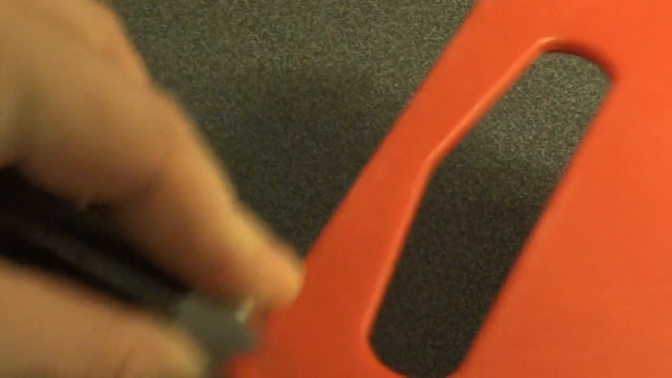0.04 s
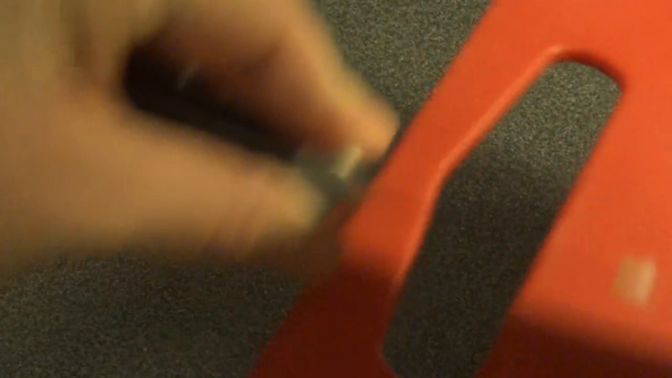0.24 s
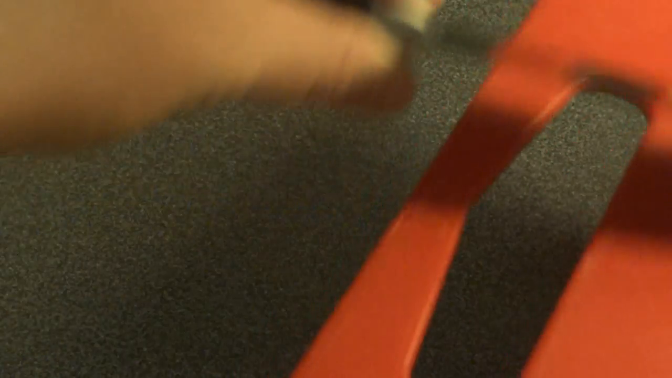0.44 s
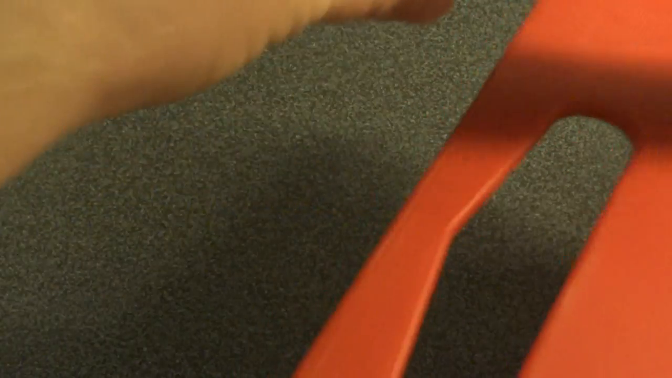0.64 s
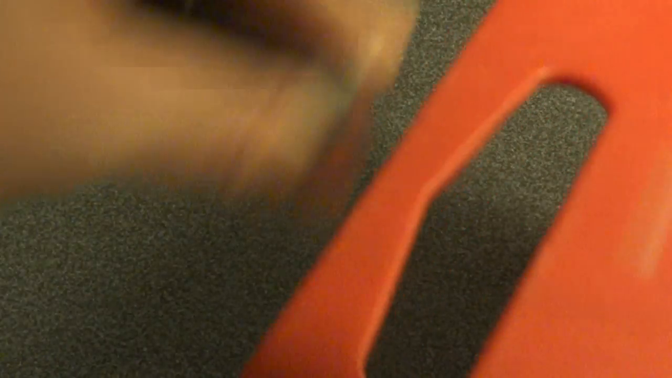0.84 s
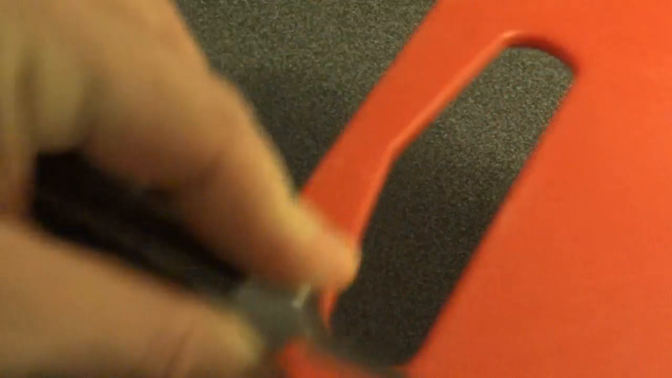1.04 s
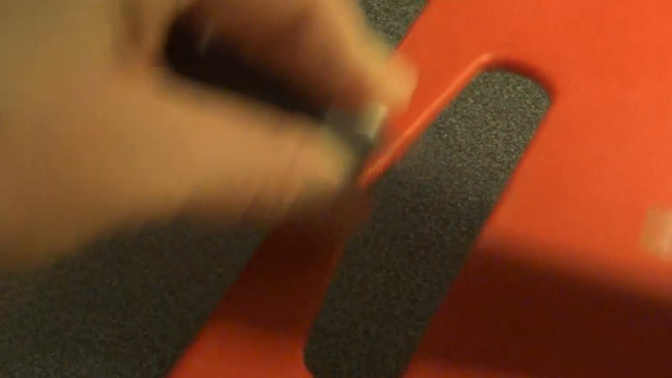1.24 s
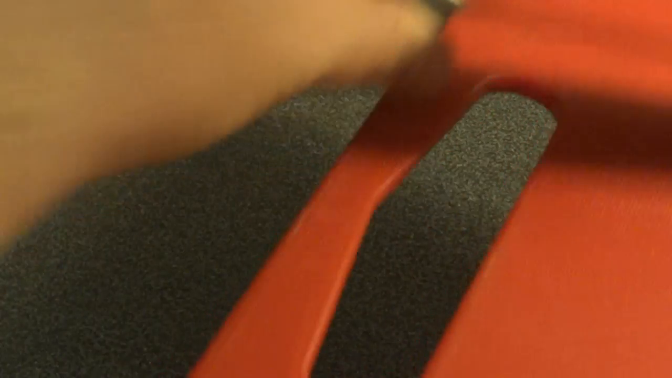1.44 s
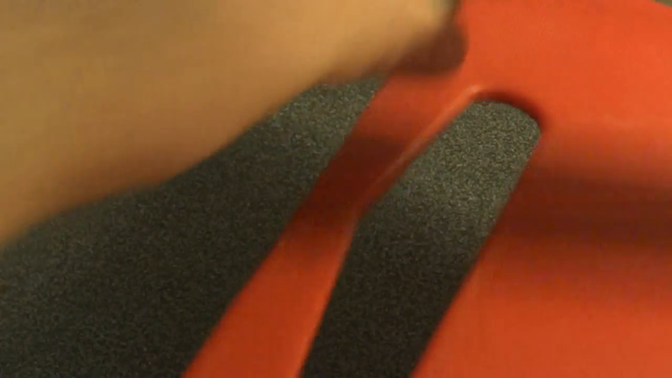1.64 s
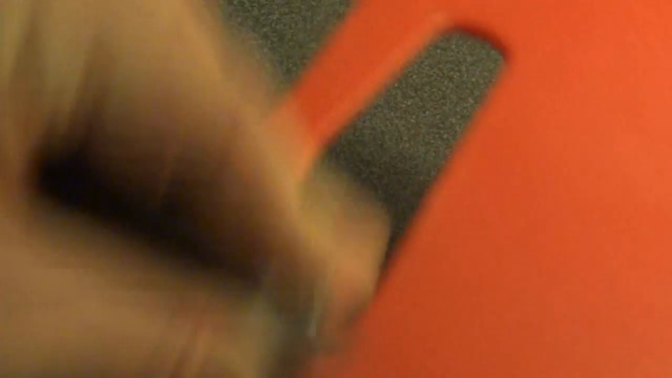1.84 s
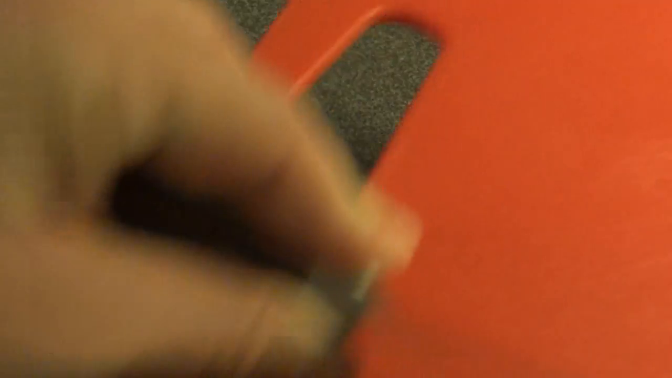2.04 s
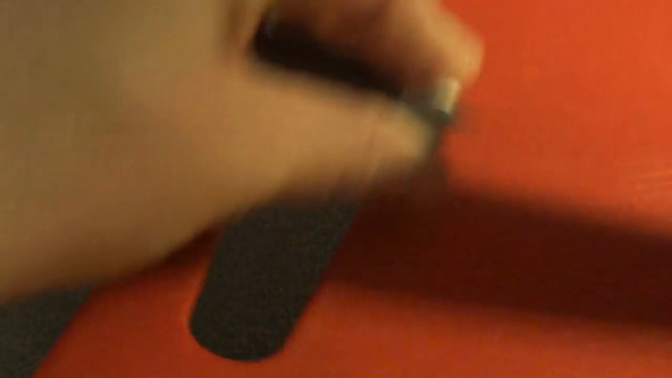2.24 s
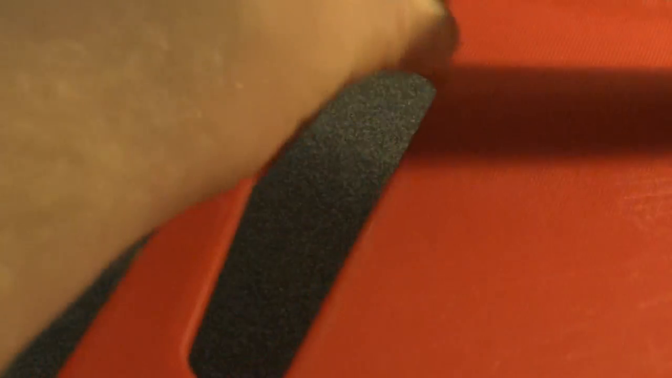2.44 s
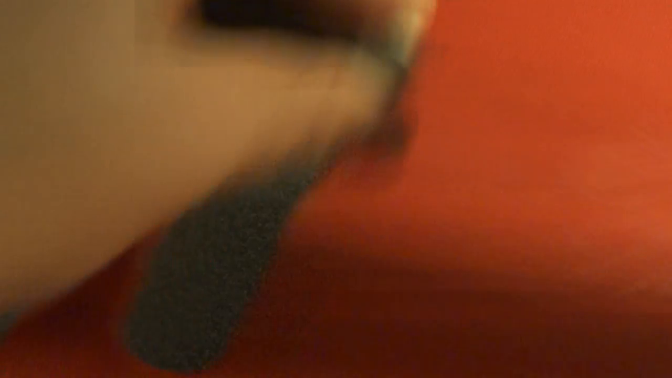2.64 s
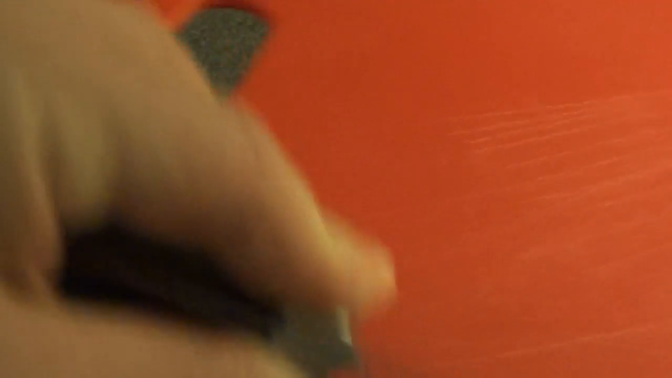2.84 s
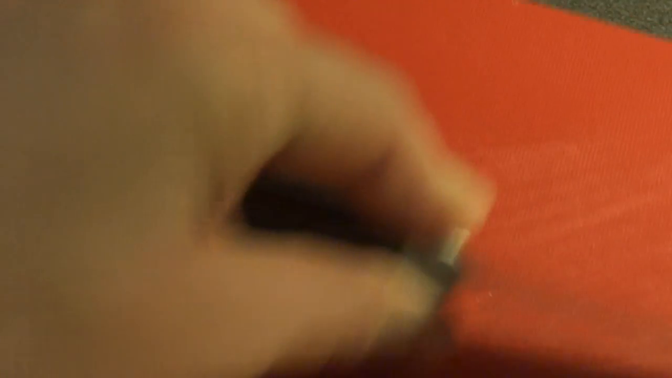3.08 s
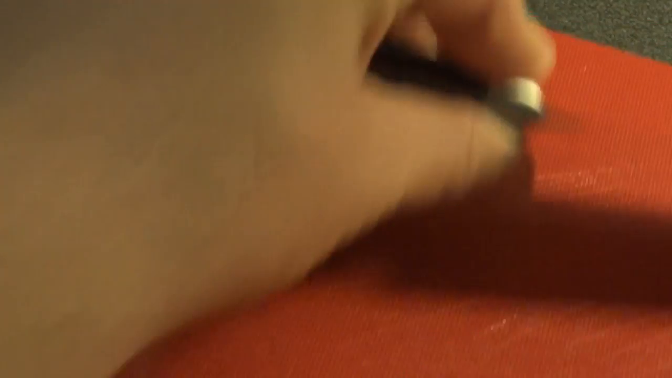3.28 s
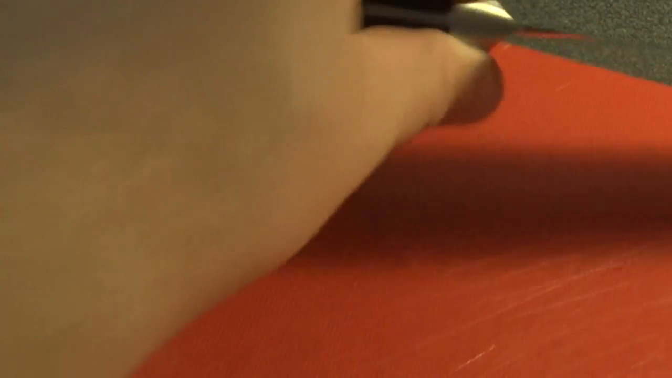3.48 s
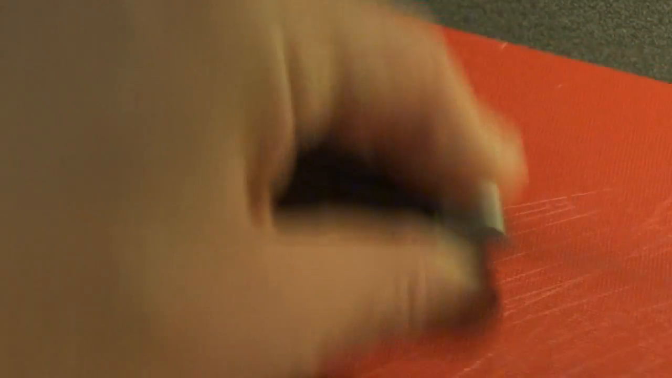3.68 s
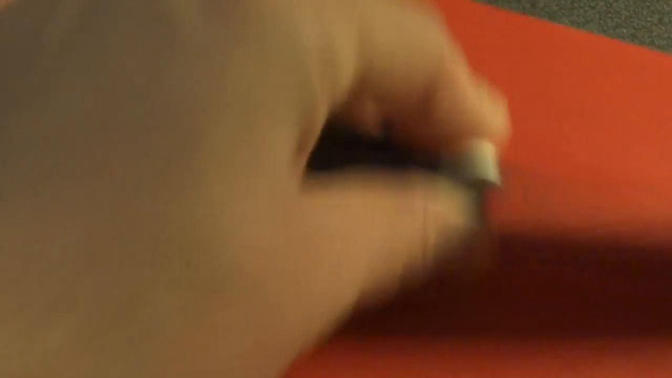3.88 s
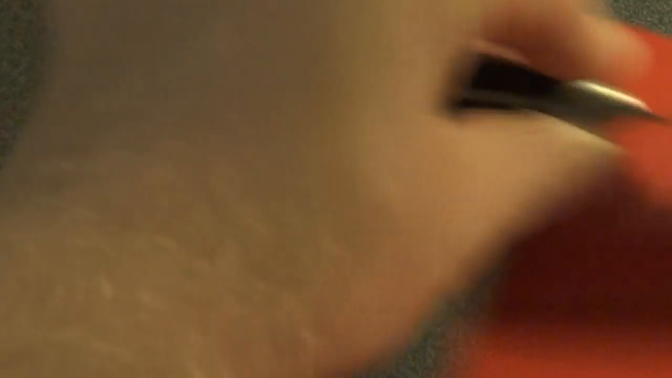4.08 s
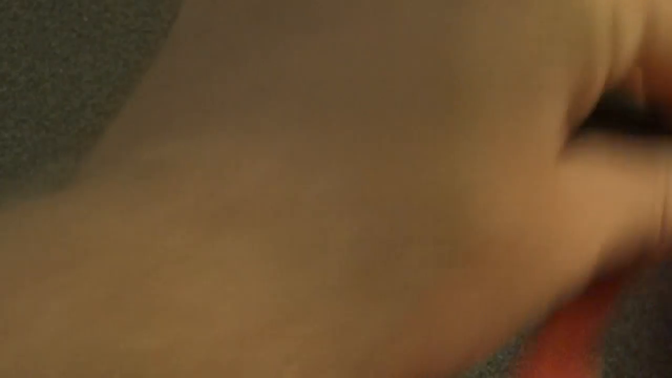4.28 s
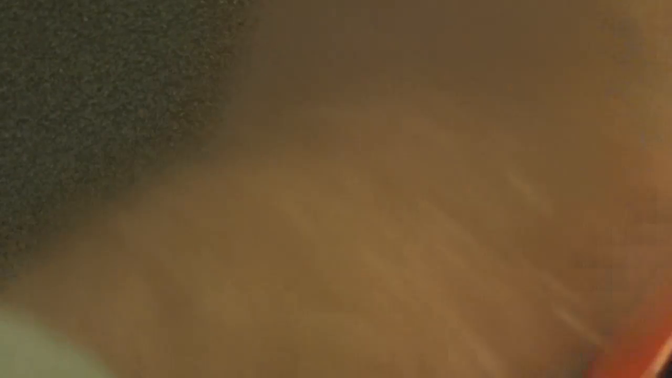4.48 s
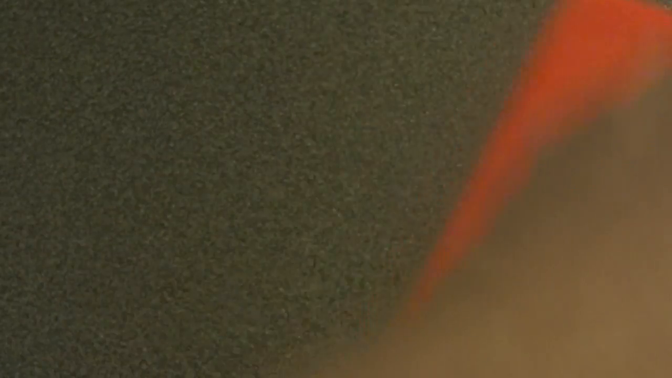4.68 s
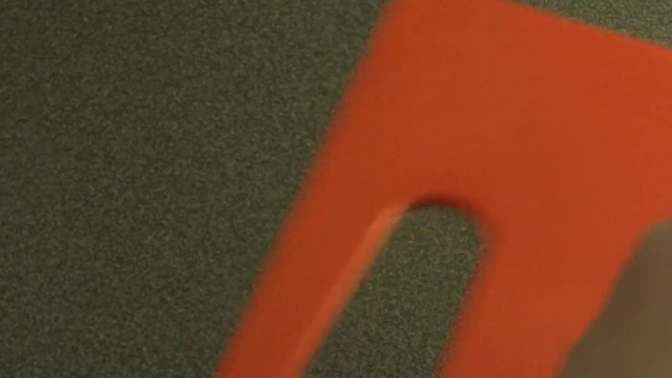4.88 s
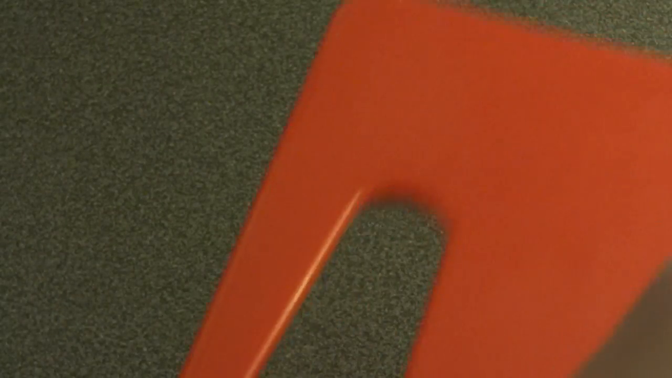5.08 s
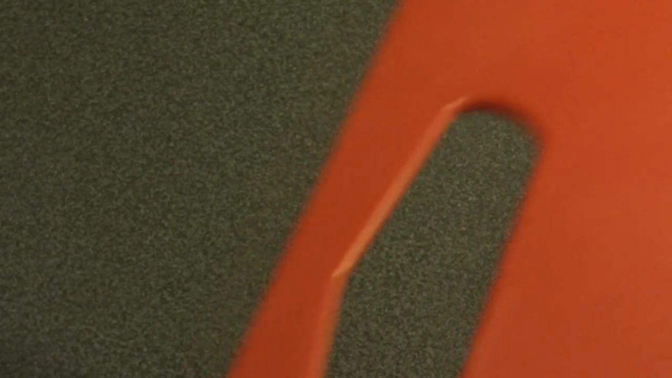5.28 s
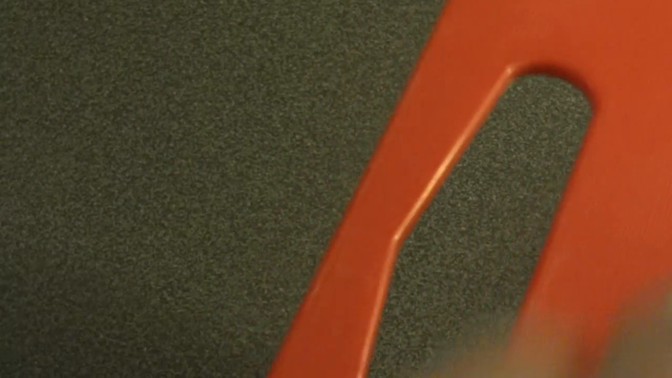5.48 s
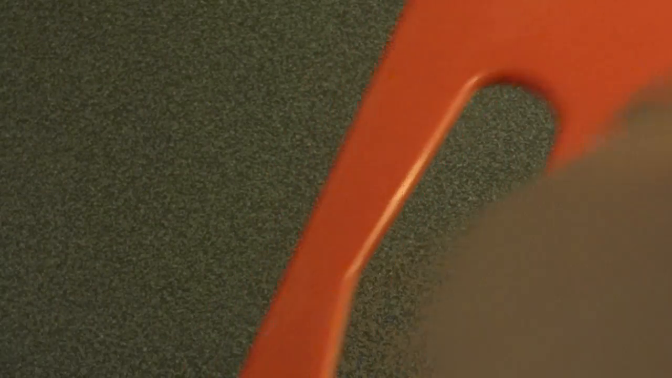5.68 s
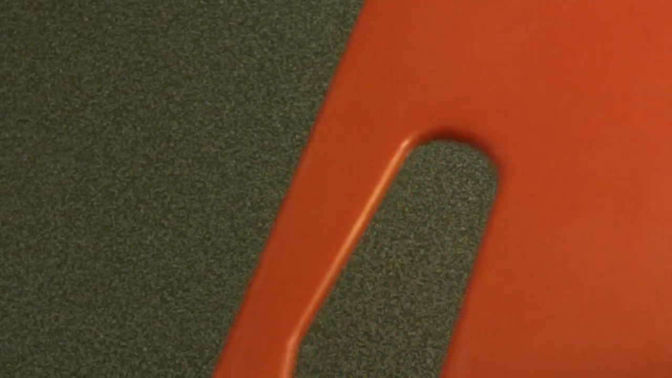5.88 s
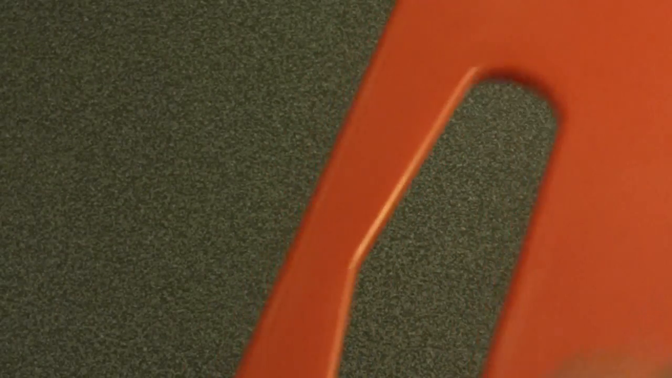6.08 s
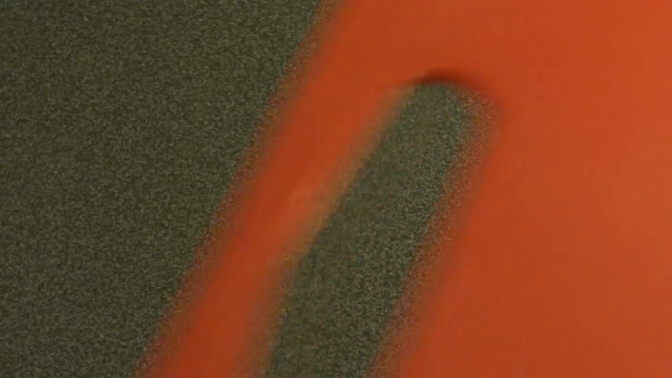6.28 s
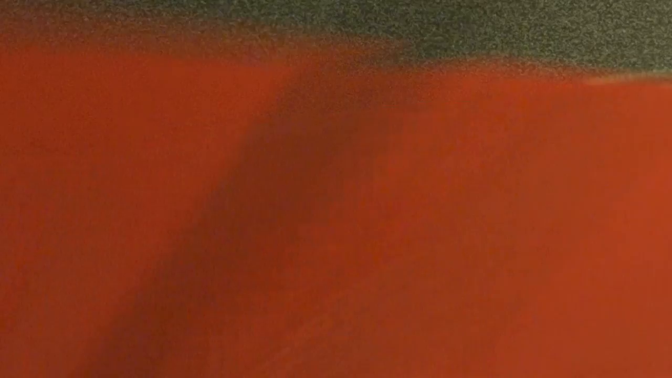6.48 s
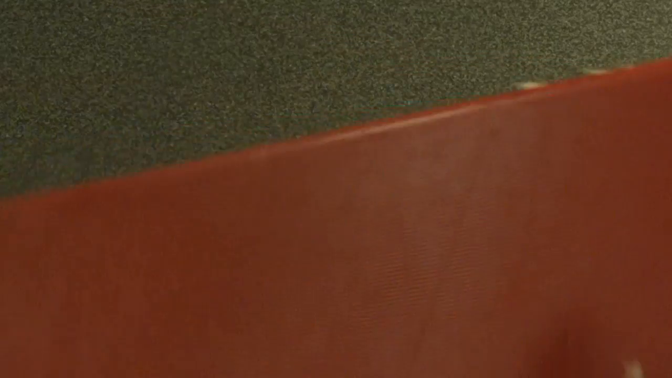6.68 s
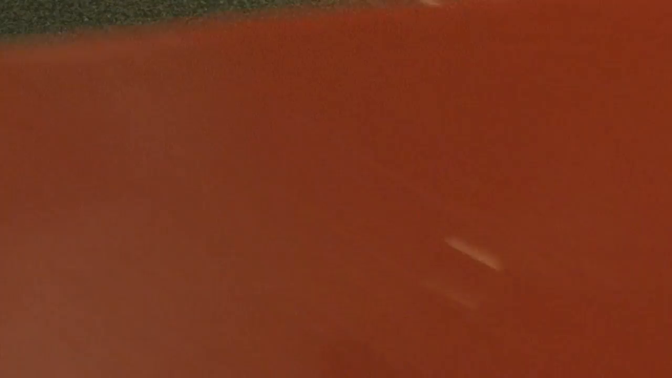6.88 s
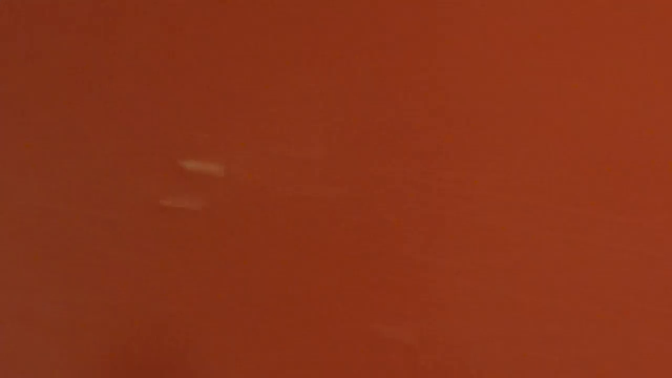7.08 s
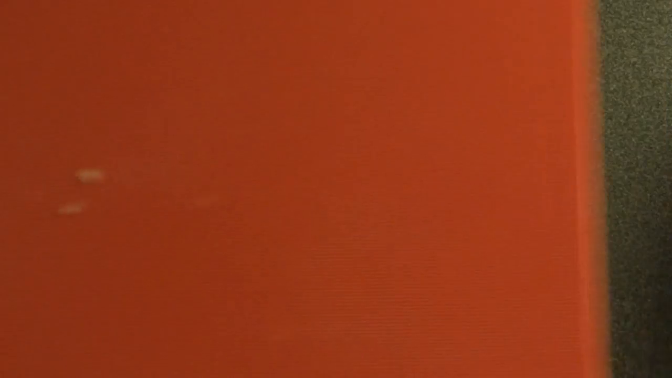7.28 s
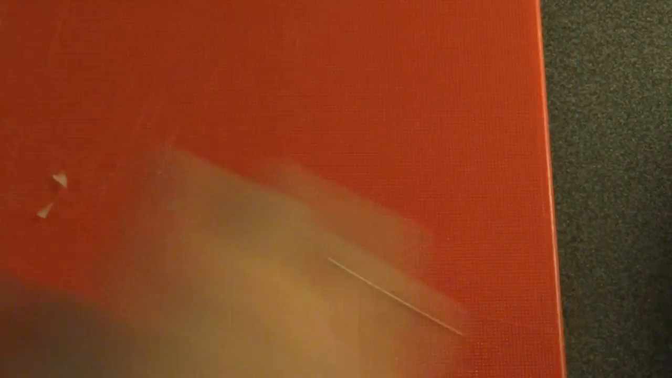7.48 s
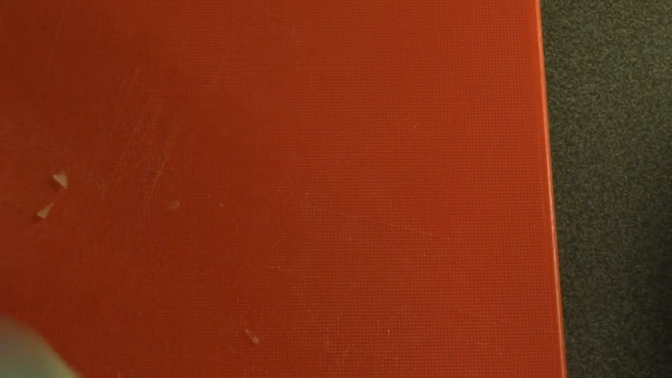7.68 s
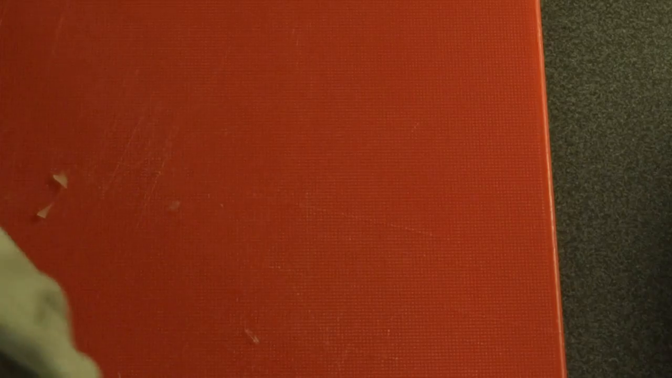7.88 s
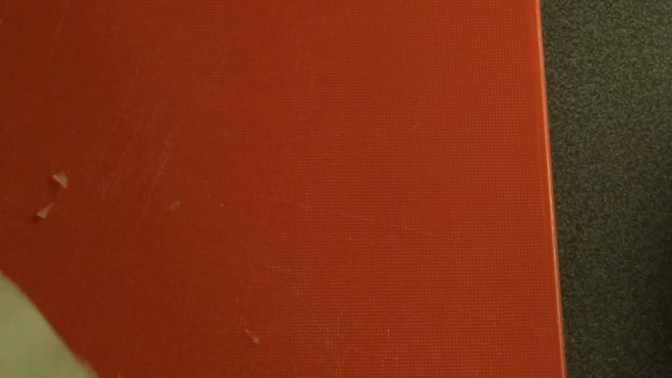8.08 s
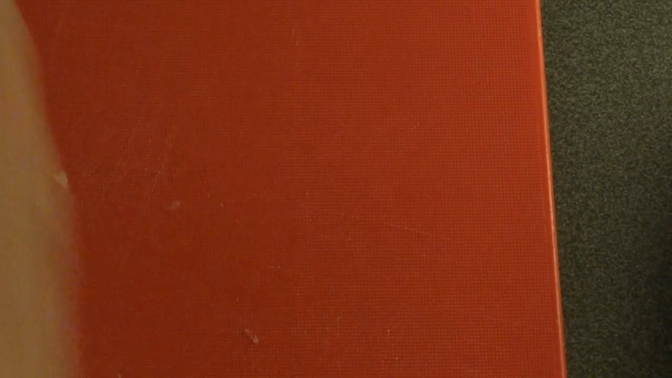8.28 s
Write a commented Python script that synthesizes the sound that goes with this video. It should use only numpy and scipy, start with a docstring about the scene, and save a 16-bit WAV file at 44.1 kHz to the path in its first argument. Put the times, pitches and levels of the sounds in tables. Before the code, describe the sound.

Over soft hiss and a faint electronic whine, a blade taps and scrapes a ridged plastic cutting board again and again, each stroke swelling and cutting off. A quieter stretch has light rubs, ringing edge flicks and a burst of sharp ticks. The board is knocked, slid and put down on the counter. Close stereo microphones, short lively room echo.

```python
"""Over a hiss and a thin electronic whine, a kitchen knife lands on a textured plastic cutting board
and rasps across it, stroke after stroke, close to the microphone. Later the blade is wiped and zings,
and the board is dragged over the counter and set down. A small hard kitchen answers.
Blows and blade are decaying tones and noise bursts, scraping is uneven jolts through the board's
resonances plus shaped noise, the kitchen is fading noise used as an echo; background noise slowly swells."""
import sys
import numpy as np
from scipy import signal
from scipy.fft import rfft, irfft, next_fast_len
from scipy.io import wavfile
from scipy.ndimage import uniform_filter1d, map_coordinates

SR = 44100
rng = np.random.default_rng(int(sys.argv[2]) if len(sys.argv) > 2 else 0)


def file_out(sig):
    """Save sig as 16-bit WAV at sys.argv[1]."""
    # one column per channel
    cols = np.atleast_2d(sig).T
    # limit, then scale
    lim = np.clip(cols, -1, 1)
    pcm = np.round(lim * 32767).astype(np.int16)
    wavfile.write(sys.argv[1], SR, pcm)


def nominal_scale(level):
    """Amplitude ratio for a level in decibels (scalar or array-like)."""
    x = np.asarray(level, float) / 20
    return 10 ** x


N = 367794
TIME = np.arange(N) / SR  # seconds


def unit(x):
    """Scales a sound to rms 1."""
    return x / np.sqrt(np.mean(x ** 2) + 1e-20)


def along(points, hz):
    """Reads a curve of (frequency, value) points on a log frequency axis."""
    f, v = np.transpose(points)
    return np.interp(np.log(hz + 1), np.log(f + 1), v)


def wobble(rate):
    """A smooth random curve with rate knots a second."""
    knots = rng.standard_normal(int(N * rate / SR) + 4)
    return map_coordinates(knots, [TIME * rate])


def filtered(x, response):
    """Multiplies the spectrum of x by a complex response of frequency."""
    m = next_fast_len(N + SR // 2)
    hz = np.fft.rfftfreq(m, 1 / SR)
    return irfft(rfft(x, m) * response(hz), m)[..., :N]


def coloured(x, spectrum):
    """Shapes x with a spectrum and brings it to rms 1."""
    return unit(filtered(x, lambda hz: nominal_scale(along(spectrum, hz))))


def add(track, s, sound):
    """Mixes a sound into the track at s seconds."""
    part = track[round(s * SR):][:len(sound)]
    part += sound[:len(part)]


# colour of the background hiss: (frequency [Hz], level [dB])
FLOOR_COLOUR = [(35, -61.5), (60, -24.5), (295, -2), (582, -4.5), (719, -2), (2160, -8), (11900, -16.5),
                (16200, -17.5)]
# steady tones of the whine: (frequency [Hz], middle level [dB rms])
WHINE_TONES = [(4107, -76.5), (8161, -85.5), (8215, -74.5), (8258, -79.5), (10573, -107), (12365, -71.5)]


def floor():
    """Room air and microphone hiss are shaped noise; the whine is sine tones, slightly unsteady."""
    mid, side = coloured(rng.standard_normal((2, N)), FLOOR_COLOUR)
    whine = np.zeros(N)
    for hz, db in WHINE_TONES:
        level = np.sqrt(2) * nominal_scale(db + 3.2 * wobble(34))
        whine += level * np.sin(2 * np.pi * hz * TIME + .7 * wobble(25))
    hiss = mid + np.outer([.3, -.3], side)
    return nominal_scale(-59.5) * hiss + whine


# resonances of the cutting board: (frequency [Hz], width [Hz], level [dB])
BOARD_MODES = [(315, 33, -5.5), (418.8, 19.3, 2.5), (470, 14, -2.5), (521.3, 17, 0), (608, 68, -2.5),
               (726.2, 19, 3), (768, 18, -7), (823.3, 25, -2.5), (931.4, 27, -4), (1017.7, 19, -4),
               (1158, 100, -12), (1256, 17, -7), (1375, 55, -13), (1629, 58, -19), (1925, 56, -16)]


def board(x):
    """Sends x through the board's resonances; a small plate radiates little bass."""
    def response(f):
        total = 0
        for k, (centre, width, db) in enumerate(BOARD_MODES):
            resonance = 1j * f * width / (centre * centre - f * f + 1j * f * width)
            total = total + (-1) ** k * nominal_scale(db) * resonance
        return total * 1j * f / (250 + 1j * f)
    return filtered(x, response)


def ring(modes, damping, rise, tilt_db):
    """Half a second of metal ringing: decaying tones, at slightly new strengths each time."""
    hz, db, t60 = np.transpose(modes)[:, :, None]
    t = TIME[:SR // 2]
    scatter_db = 1.5 * rng.standard_normal(db.shape)
    level = db + scatter_db + tilt_db * np.log2(hz / 4000) - 60 * t / (t60 * damping)
    # a hand-held blade never rings quite pure
    drift = .7 * np.cumsum(rng.standard_normal(level.shape), axis=1) / np.sqrt(SR)
    phase = 2 * np.pi * (hz * t + drift + rng.random(db.shape))
    return (nominal_scale(level) * np.sin(phase)).sum(0) * (1 - np.exp(-(t / rise) ** 2))


def band(lo_hz, hi_hz, x):
    """Keeps the sound between two frequencies."""
    return signal.sosfilt(signal.butter(2, [lo_hz, hi_hz], "band", fs=SR, output="sos"), x)


# blows on the board; the last three levels are relative to the second column:
# (time [s], level [dB], thud [dB], treble [dB], blade ring [dB])
BLOWS = [(.011, -18.5, 3.5, -26, -25), (1.028, -18, 5.5, -27, -29.5), (1.926, -11.5, -1.5, -35.5, -33),
         (2.9066, -15.5, 3, -24.5, -27.5), (3.8008, -26.5, 13, -22, -25), (4.26, -17, 4.5, -21, -26),
         (4.9696, -17, -5, -1.5, -21.5), (5.8677, -27.5, 1, 13.5, 1), (6.7196, -10.5, -9, -13.5, -27.5),
         (6.792, -15, -11, -20.5, -27), (7.3765, -10, -7.5, -9.5, -26.5)]
# the blade bending as a whole: (frequency [Hz], level [dB], undamped time to fall 60 dB [s])
BLADE_MODES = [(1475, -5, 1.4), (3463, 0, .75), (5986, -5, .7), (9512, -9, .42), (12770, -11, .33)]


def taps():
    """Each blow: a click in the plastic, a thud in the board, a splash of treble and a ring of the blade."""
    click, thuds, splash, blade = np.zeros((4, N))
    t = TIME[:SR // 10]
    # both noise bursts fade fast at first, then slowly
    click_fade = nominal_scale(-60 * t / 0.017) + 0.33 * nominal_scale(-60 * t / 0.12)
    splash_fade = nominal_scale(-60 * t / 0.013) + 0.18 * nominal_scale(-60 * t / 0.087)
    for s, db, thud_db, treble_db, ring_db in BLOWS:
        crack = rng.standard_normal((2, len(t)))
        add(click, s, nominal_scale(db) * crack[0] * click_fade)
        add(splash, s, nominal_scale(db + treble_db) * crack[1] * splash_fade)
        add(thuds, s, nominal_scale(db + thud_db + 36.5) * np.hanning(8) / 4)
        add(blade, s, nominal_scale(db + ring_db) * ring(BLADE_MODES, .12, rise=.001, tilt_db=0))
    click = nominal_scale(1.5) * band(1100, 4400, click)
    splash = nominal_scale(3) * band(6000, 15500, splash)
    return click + splash + board(thuds) + blade


# scraping strokes, each starting at the blow before it; levels are relative within each layer:
# (fastest moment [s], blade lifts [s], top board drone [dB], rasp before its swell [dB], edge hiss [dB])
SCRAPES = [(0.221, 0.562, -13.5, -31.5, -37.5), (1.182, 1.45, -18, -30.5, -36),
           (2.189, 2.424, -15.5, -30.5, -35), (3.211, 3.371, -11.5, -29.5, -37.5),
           (3.865, 3.95, -19, -31, -35.5), (4.281, 4.336, -23.5, -30.5, -36)]
# fall after the blade lifts, for drone, rasp and hiss: (fade [dB per s])
LIFT_FADES = [142.5, 172.5, 197.5]
ROUND = .7  # power of speed; below 1 the drone climbs early and lingers near its top


def strokes():
    """Gains of drone, rasp and hiss, and speed: drone follows speed, the others soon level off; all die at the lift."""
    creep_db, lift_db = -33, -28  # board drone as a stroke sets off and as it ends
    rasp_creep_db, hiss_creep_db = -38.5, -51.5  # rasp and hiss as a stroke sets off
    bite_share = 0.71  # rasp and hiss level off after this share of the speeding up
    rasp_swell_db = 2  # the rasp gains this much at full speed
    chatter_db, chatter_s = -28, .1  # the landed blade chatters: level, time to fall 60 dB
    usual_rasp_db, faster_per_db = -31, 2  # a raspier stroke is faster: dB of speed per dB of rasp
    gain, pace = np.zeros((3, N)), np.zeros(N)
    for fast, lift, drone_db, rasp_db, hiss_db in SCRAPES:
        land = max(s for s, *_ in BLOWS if s < fast)
        bite = land + bite_share * (fast - land)
        speed = np.interp(TIME, [land, fast, lift], [0, 1, 0])
        pace += speed * nominal_scale(faster_per_db * (rasp_db - usual_rasp_db))
        ends_db = np.where(TIME < fast, creep_db, lift_db)
        moving_db = [ends_db + (drone_db - ends_db) * speed ** ROUND,
                     np.interp(TIME, [land, bite], [rasp_creep_db, rasp_db]) + rasp_swell_db * speed,
                     np.interp(TIME, [land, bite], [hiss_creep_db, hiss_db])]
        fade_db = np.outer(LIFT_FADES, np.maximum(TIME - lift, 0))
        since = np.maximum(TIME - land, 0)
        chatter = np.outer([1, 1, 0], nominal_scale(chatter_db - 60 * since / chatter_s))
        gain += (nominal_scale(moving_db - fade_db) + chatter) * (TIME >= land)
    return gain, pace


def slips(rate, jitter, size_db):
    """Uneven impulses: the edge catches and lets go, about rate times a second."""
    steps = np.cumsum(rate * np.exp(jitter * wobble(400)) / SR)
    return np.diff(np.floor(steps), prepend=0) * nominal_scale(size_db * rng.standard_normal(N))


def streaky(x, depth_db):
    """Many close plate modes come and go as the contact point moves: narrow streaks of gain."""
    z = signal.stft(x, nperseg=1024)[2]
    field = uniform_filter1d(rng.standard_normal(z.shape), size=2, axis=0)
    field = uniform_filter1d(field, size=7, axis=1)
    return unit(signal.istft(z * nominal_scale(depth_db * unit(field)), nperseg=1024)[1][:N])


# colour of the counter under the board: (frequency [Hz], level [dB])
COUNTER_COLOUR = [(29, -63.5), (50, -34), (118, -13), (156, -10.5), (300, 1), (390, -16.5), (660, -120)]


def counter(drone):
    """The counter under the board booms with the drone and the bumps: low shaped noise."""
    return (bumps() + nominal_scale(-31) * drone) * coloured(rng.standard_normal(N), COUNTER_COLOUR)


# colour of the rasp: (frequency [Hz], level [dB])
RASP_COLOUR = [(530, -41.5), (900, -5.5), (1760, -4.5), (1910, -7.5), (2160, -8), (3060, -7.5),
               (6500, -23.5), (8450, -72), (14300, -120)]
# colour of the edge hiss: (frequency [Hz], level [dB])
HISS_COLOUR = [(2940, -14), (5000, -1), (5800, -3), (6880, -2.5), (12900, -5), (15300, -11), (16200, -36)]


def friction():
    """The edge hops over the board's ridges, faster in mid-stroke; bigger jolts shake rasp and hiss."""
    stroke, speed = strokes()
    # the slow background swell shares these three layers
    drone, rasp, hiss = stroke + background_swell() + rubs() + drag()
    slow_hz, fast_hz = 421, 569.6  # ridges passed a second, creeping and at the usual full speed
    ridge_hz = slow_hz + (fast_hz - slow_hz) * speed ** ROUND
    jolts = slips(ridge_hz * .3, jitter=.5, size_db=4.5)
    jolts = np.convolve(jolts, np.exp(-TIME[:400] / 0.0031))[:N]
    jolts /= jolts.mean()
    hops = unit(slips(ridge_hz, jitter=.18, size_db=3) * (1.1 + jolts))
    hops = streaky(hops + .95 * rng.standard_normal(N), depth_db=2.5)
    loudness = nominal_scale(-3) / np.std(board(hops))
    scratch = coloured(streaky(rng.standard_normal(N) * (2.5 + jolts), depth_db=3.5), RASP_COLOUR)
    grit = coloured(streaky(rng.standard_normal(N) * (3 + jolts), depth_db=3.5), HISS_COLOUR)
    scrape = loudness * board(drone * hops) + nominal_scale(-2.63) * rasp * scratch + nominal_scale(-2.83) * hiss * grit
    return scrape + counter(drone)


# how long the kitchen echoes: (frequency [Hz], time to fall 60 dB [s])
KITCHEN_DECAY = [(150, 0.12), (1000, 0.5), (5000, 0.44), (14000, 0.69)]


def kitchen(x):
    """Hard walls answer with fading noise: a tail for each ear, drawn anew every third of a second."""
    out, step = np.zeros((2, N + SR)), SR // 3
    for start in range(0, N, step):
        hz, t, z = signal.stft(rng.standard_normal((2, SR // 2)), SR, nperseg=256)
        fade = nominal_scale(-60 * t / along(KITCHEN_DECAY, hz)[:, None])
        tail = signal.istft(z * fade, SR, nperseg=256)[1]
        tail = tail / np.linalg.norm(tail[0])
        wet = signal.fftconvolve(x[None, start:start + step], tail, axes=1)
        late = start + 200  # the echo starts 200 samples late
        out[:, late:late + wet.shape[1]] += wet[:, :N + SR - late]
    common = out[:, :N].mean(0)
    return common + .5 * (out[:, :N] - common)  # close-set microphones hear much the same tail


# the blade leaves the board and sings until the hand stills it:
# (time [s], level [dB], rise [s], brightness [dB per octave], held [s])
LIFT_RINGS = [(.73, -77, .06, -18, .14), (1.655, -70, .04, -19, .09), (2.39, -41, .04, -6, .2)]
# the blade is knocked while gripped: (time [s], level [dB], rise [s], brightness [dB per octave], held [s])
GRIPPED_KNOCK = (5.868, -25, .02, 3, .15)


def singing():
    """The free blade rings long, then is damped quickly."""
    out, t = np.zeros(N), TIME[:SR // 2]
    rings = [(row, BLADE_MODES) for row in LIFT_RINGS]
    rings.append((GRIPPED_KNOCK, BLADE_MODES[1:]))  # the grip silences the lowest mode
    for (s, db, rise, tilt_db, held), modes in rings:
        stilled_db = -60 * np.maximum(t - held, 0) / .35
        add(out, s, nominal_scale(db + stilled_db) * ring(modes, 0.92, rise, tilt_db))
    return out * nominal_scale(2.5 * wobble(40))  # the grip shifts while the blade sings


def peaked(s, swell, fade_db_per_s):
    """Level in dB against the top: a straight rise of 44.5 dB during the swell up to s, then a straight fall."""
    return np.where(TIME < s, 44.5 * (TIME - s) / swell, fade_db_per_s * (s - TIME))


def layers(db, bright_db):
    """Gains of drone, rasp and hiss from a level and a brightness; the drone drops as the sound gets brighter."""
    return nominal_scale([db - 4 - 0.17 * bright_db, db, db + bright_db])


def swells(rows):
    """Adds up the gains of drone, rasp and hiss over rows that each swell to a peak and fade."""
    return sum(layers(db + peaked(s, swell, fade), bright_db) for s, swell, db, bright_db, fade in rows)


# one slow swell of the background (the only row with a swell over 1 s), and lighter rubs of blade,
# cloth and board (all other rows); levels are relative:
# (loudest moment [s], swell [s], rasp [dB], hiss over rasp [dB], fade [dB per s])
SWELL_AND_RUBS = [(2.41, 0.05, -46.5, -25.5, 150.5), (4.571, 0.0033, -52, -11.5, 94),
                  (4.80, 0.056, -78.5, 17.5, 12), (4.976, .003, -34, 1, 146.5),
                  (5.315, 0.21, -59, 21.5, 303.5), (5.345, .01, -39, 4, 145), (5.55, 0.019, -70, 8.5, 298),
                  (5.868, .001, -33, 11.5, 103.5), (5.94, 0.11, -30, -3, 162), (6.168, 0.059, -52, 0, 90),
                  (6.726, 0.0039, -23, -6, 101), (7.271, 0.036, -54, -4, 102),
                  (7.371, 0.048, -36.5, -1.5, 298), (7.39, 0.029, -30, 0, 161), (7.6, 6.8, -61.5, 3.5, 13),
                  (7.779, 0.0056, -55.5, 2.5, 21), (8.29, 0.0092, -62, -16, 140)]


def background_swell():
    """The background hiss grows slowly louder until 7.6 s, then fades."""
    return swells([row for row in SWELL_AND_RUBS if row[1] > 1])


def rubs():
    """Gains of drone, rasp and hiss for light rubs, each swelling briefly to a peak and fading."""
    return swells([row for row in SWELL_AND_RUBS if row[1] <= 1])


# small ticks of one colour: (time [s], level [dB], pitch [Hz], ringing [cycles])
SMALL_TICKS = [(4.5655, -24.5, 2790, 1.4), (5.8706, -5.5, 10990, 2), (5.8785, -3, 11550, 1.8),
               (5.8936, -3, 11700, 2), (5.899, -7.5, 11240, 2), (5.91, -7.5, 11400, 2),
               (5.9118, -7.5, 10000, 4), (6.1664, -32.5, 8870, 1.2), (7.0875, -28.5, 12050, 1.5),
               (7.1096, -22.5, 13080, 1.5), (7.706, -19, 6800, 3.3), (7.7765, -20.5, 3850, 4.1),
               (8.1385, -46, 10820, 2.5), (8.2932, -37.5, 1370, 2.6)]


def ticks():
    """A few cycles at one pitch, a noisy after-ring around it and a faint snap on top."""
    out, t = np.zeros(N), TIME[:SR // 15]
    for s, db, hz, cycles in SMALL_TICKS:
        soft_start = 1 - np.exp(-(t * hz / .5) ** 2)  # over about half a cycle
        tone = np.sin(2 * np.pi * hz * t) * np.exp(-t * hz / cycles) * soft_start
        buzz = unit(np.convolve(rng.standard_normal(len(t)), tone)[:len(t)])
        buzz = buzz * nominal_scale(-21 - 60 * t / .07)
        snap = 0.08 * np.diff(rng.standard_normal(len(t) + 1)) * nominal_scale(-60 * t / 0.0075)
        add(out, s, nominal_scale(db) * (tone + buzz + snap))
    return out


# a wipe flicks the edge: (time [s], level [dB], rise [s], brightness [dB per octave])
WIPES = [(4.70, -50, .02, 0), (5.318, -23, .012, .5), (5.542, -53, .005, 3), (6.18, -40, .006, 5)]
# the thin edge ringing: (frequency [Hz], level [dB], undamped time to fall 60 dB [s])
EDGE_MODES = [(656, -11, 0.21), (1510, -7, 0.46), (2085, -6.5, 0.5), (2590, -9, 0.22), (3065, -14, .3),
              (3610, -11, 0.51), (4180, -7.5, 0.29), (5080, -9.5, .55), (5590, -9, 0.38), (5920, -9.5, .25),
              (7080, -10.5, 0.42), (7830, -10, .22), (8600, -4, 0.27), (9600, -2.5, 0.28), (10430, -4, .22),
              (11400, 5, 0.15), (12500, -2.5, .2), (13100, -5, .18), (14200, -1, 0.23), (15200, -6, .2)]


def zings():
    """The edge set ringing by a brush rather than a blow; the brush is heard as a bright swish."""
    out, t = np.zeros(N), TIME[:SR // 2]
    for s, db, rise, tilt_db in WIPES:
        touch = 0.99 * np.exp(-(t / rise - 1) ** 2)
        swish = touch * np.diff(rng.standard_normal(len(t) + 1))
        edge = ring(EDGE_MODES, .52, rise, tilt_db)  # decay times are cut to .52
        add(out, s, nominal_scale(db) * (edge * (1 + 1.2 * touch) + swish))
    return out


# the counter is bumped: (time [s], level [dB])
COUNTER_BUMPS = [(6.73, -44), (6.82, -52), (7.17, -50), (7.28, -59), (7.389, -31)]


def bumps():
    """Gain of the counter's boom when it is bumped: a quick swell and a fast fade each time."""
    return sum(nominal_scale(db + peaked(s, swell=0.017, fade_db_per_s=147)) for s, db in COUNTER_BUMPS)


# the board is dragged over the counter; levels are relative: (time [s], rasp [dB], hiss over rasp [dB])
BOARD_DRAG = [(6.8, -41, -24), (6.9, -42.5, -32), (7.03, -32, -12.5), (7.115, -34, -3.5), (7.21, -43.5, -7),
              (7.34, -51, 5.5), (7.4, -70, 4)]


def drag():
    """Gains of drone, rasp and hiss while the board slides over the counter."""
    s, db, bright_db = np.transpose(BOARD_DRAG)
    return layers(np.interp(TIME, s, db, -120, -120), np.interp(TIME, s, bright_db))


# the work moves a little to the left; the right gets the opposite gain: (time [s], left gain [dB])
SIDEWAYS = [(6.3, -0.36), (6.8, 0.5)]


def scene():
    """Knife and board near the microphone, in the kitchen."""
    near = friction() + taps() + ticks() + zings() + singing()
    # a small phase split between the ports
    split = [(100, -10.5), (600, 1.5), (3000, -0.5), (12000, -8)]  # (frequency [Hz], level [dB])
    apart = filtered(near, lambda hz: 0.17 * 1j * nominal_scale(along(split, hz)))
    left_db = np.interp(TIME, *np.transpose(SIDEWAYS))
    direct = near * nominal_scale(np.outer([1, -1], left_db)) + np.outer([1, -1], apart)
    return direct + nominal_scale(-10.0) * kitchen(near) + floor()


def roll_off(x):
    """The treble ends steeply here."""
    return signal.sosfilt(signal.butter(12, 16990, fs=SR, output="sos"), x)


def record(dry):
    """The microphone cuts deep bass and the highest treble."""
    heard = filtered(dry, lambda hz: 1j * hz / (120 + 1j * hz) * (hz < 16400))
    return roll_off(heard)


dry = scene()
out = record(dry)
file_out(out)
```